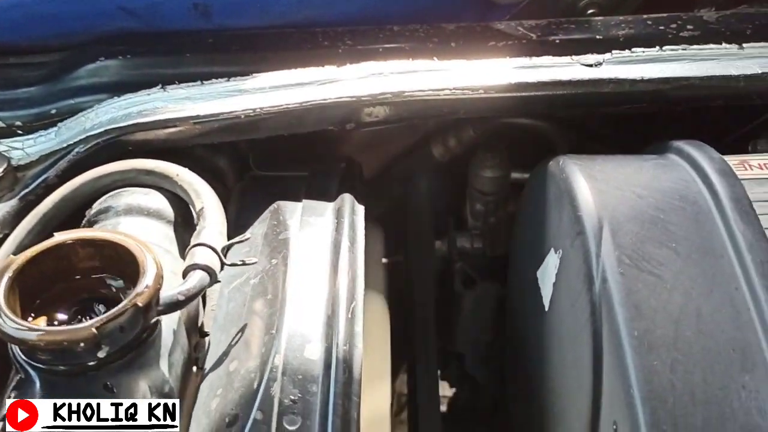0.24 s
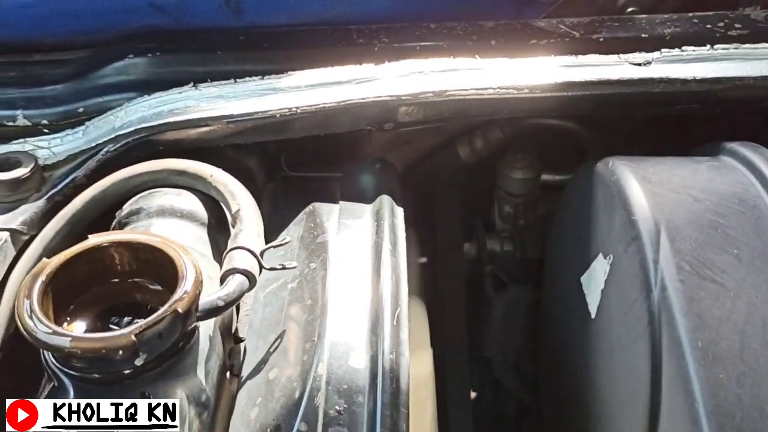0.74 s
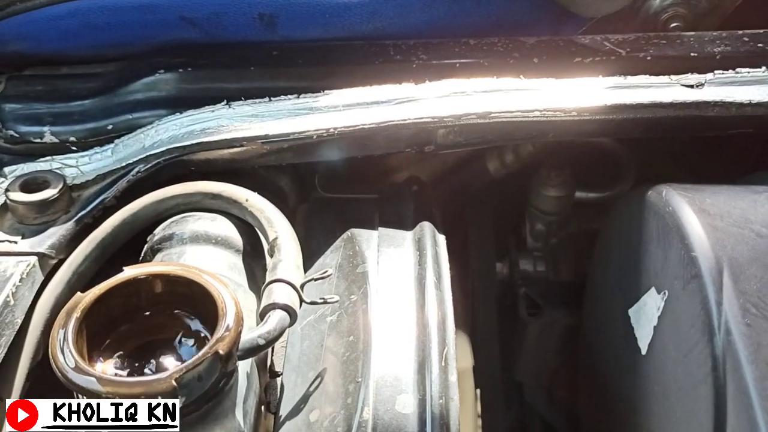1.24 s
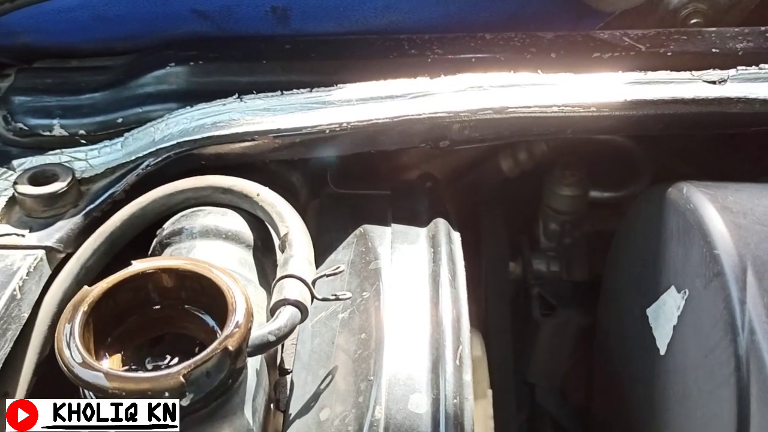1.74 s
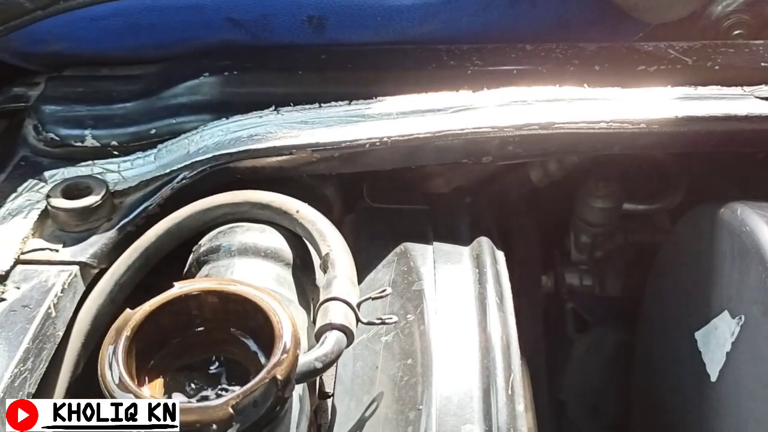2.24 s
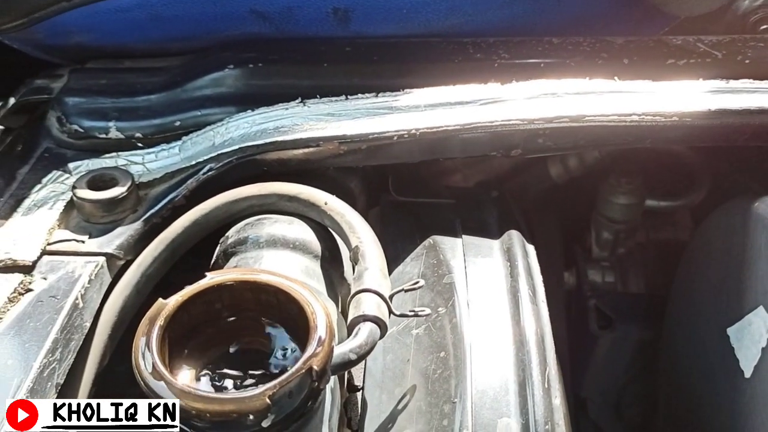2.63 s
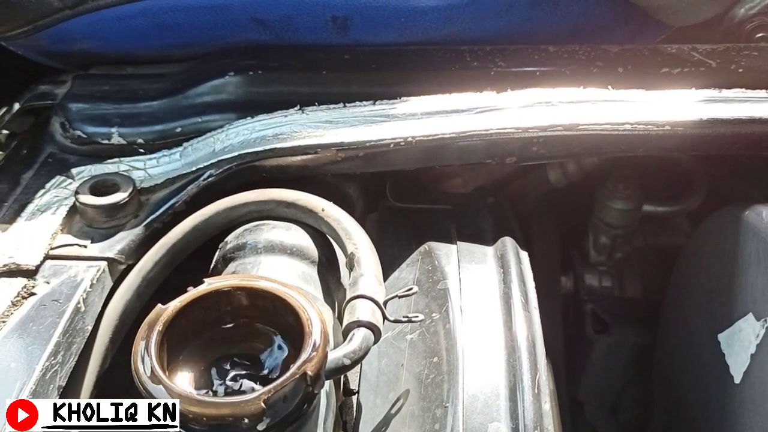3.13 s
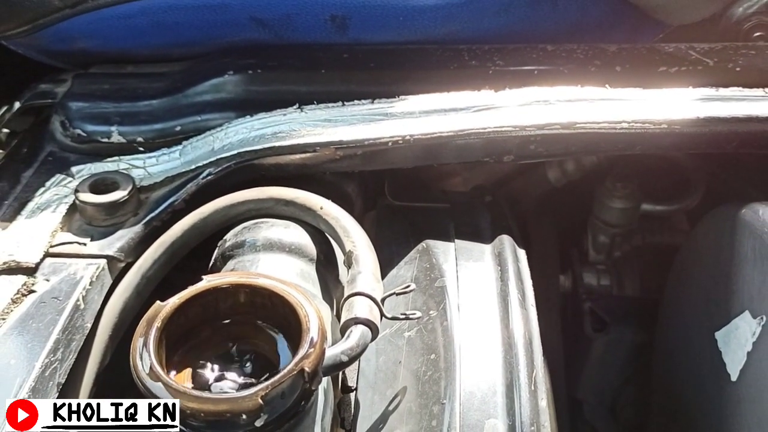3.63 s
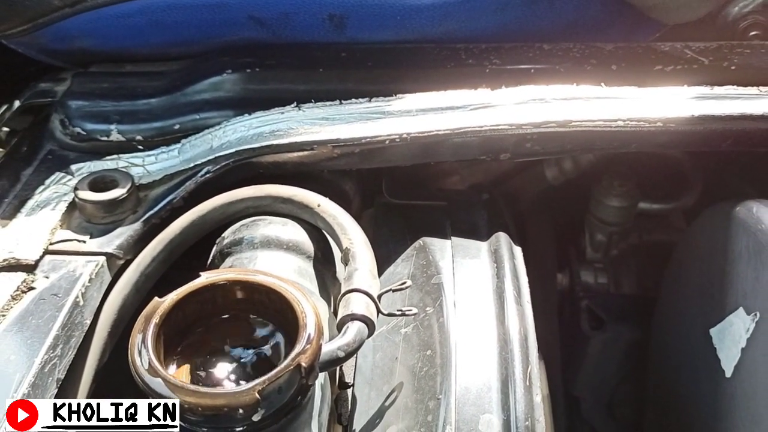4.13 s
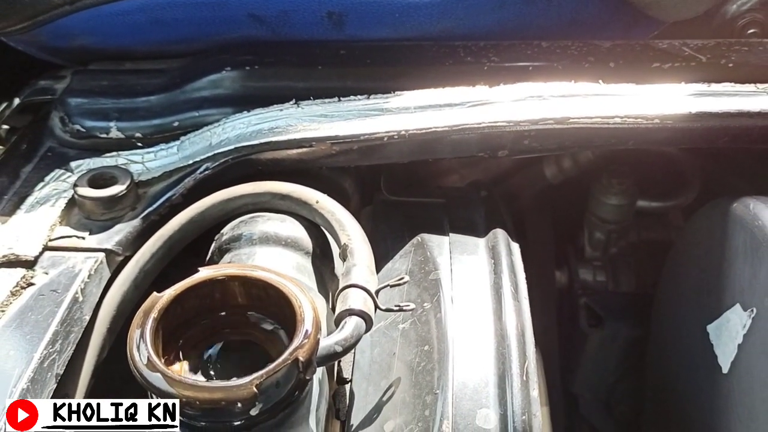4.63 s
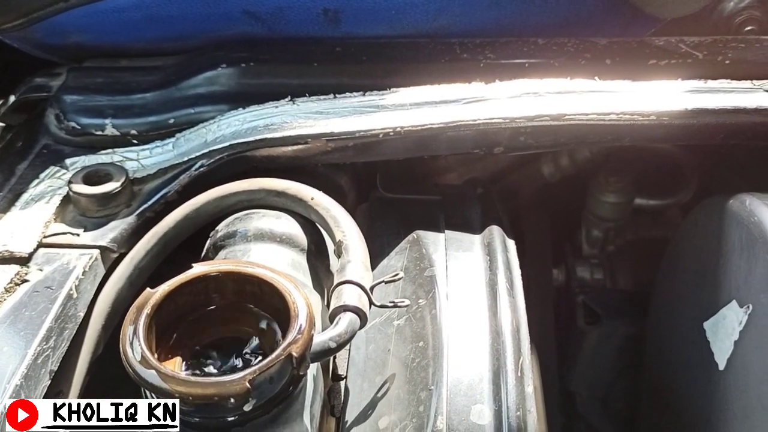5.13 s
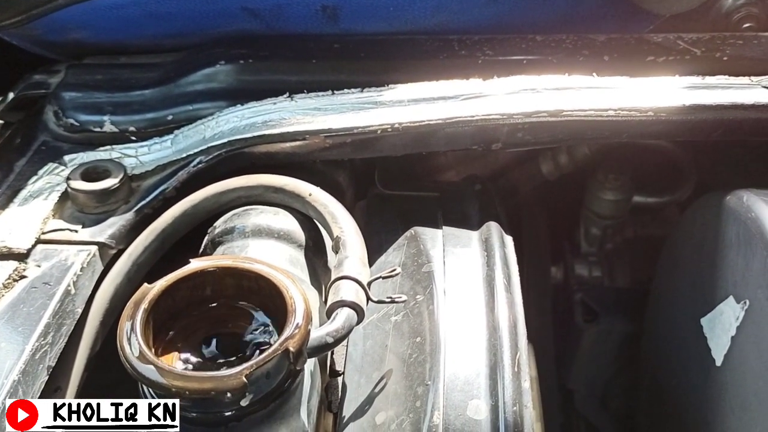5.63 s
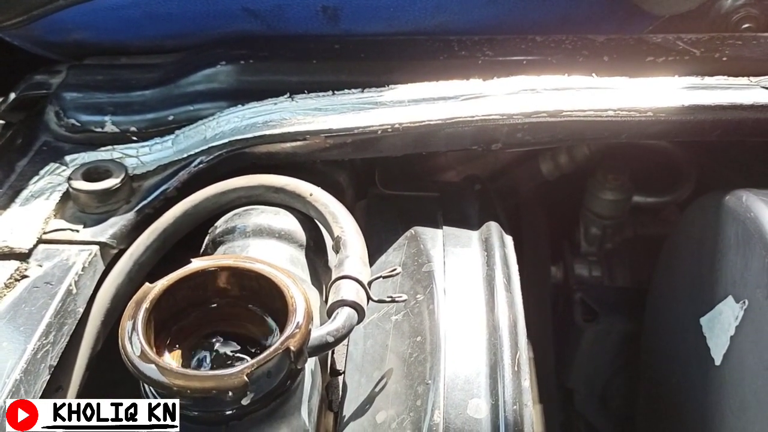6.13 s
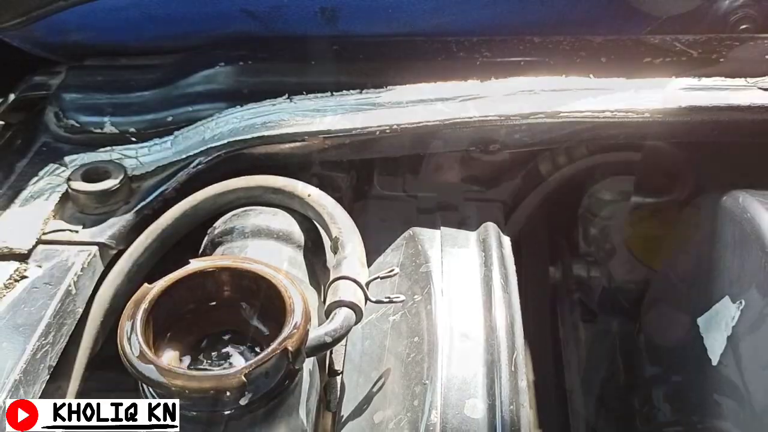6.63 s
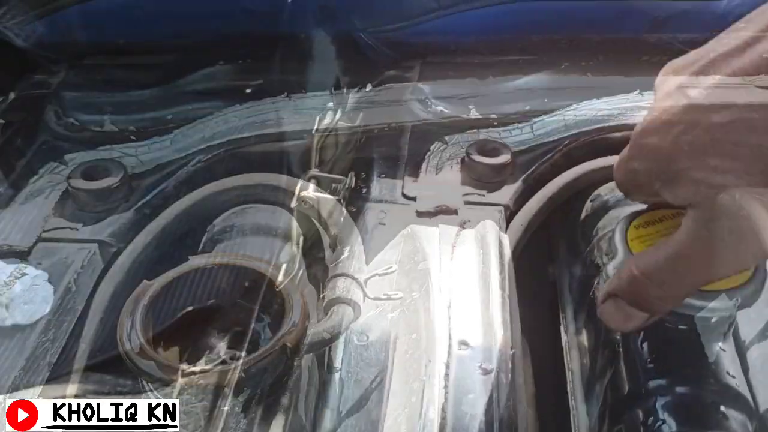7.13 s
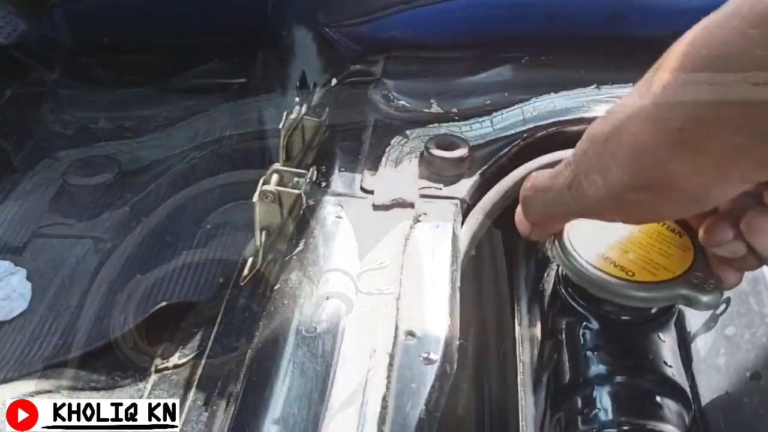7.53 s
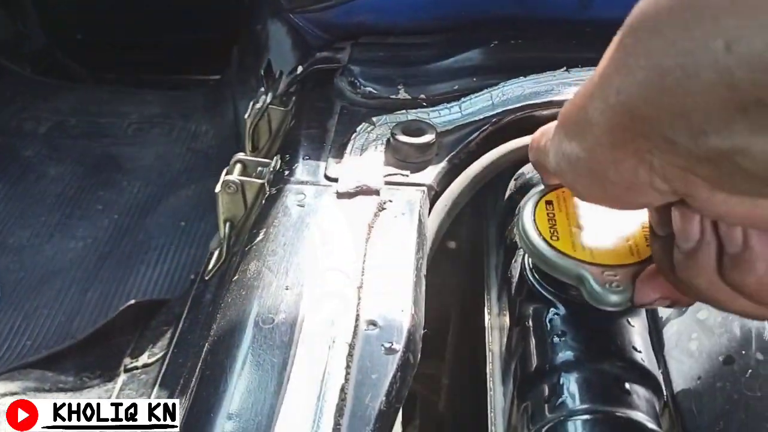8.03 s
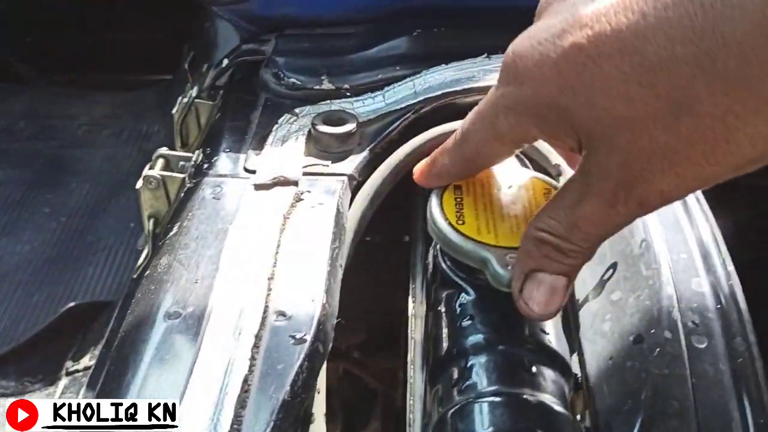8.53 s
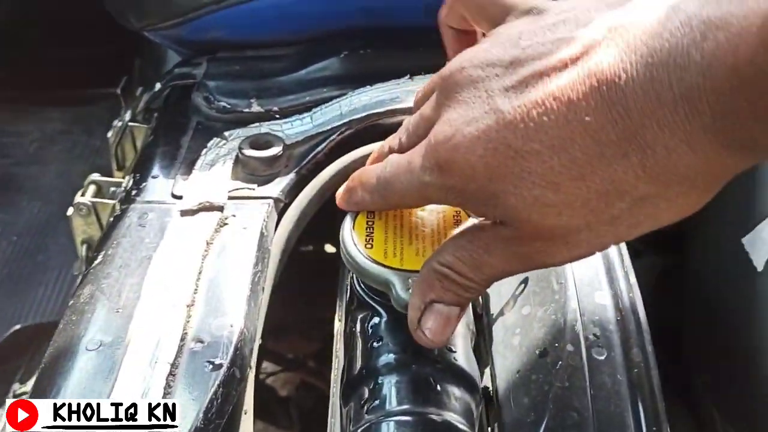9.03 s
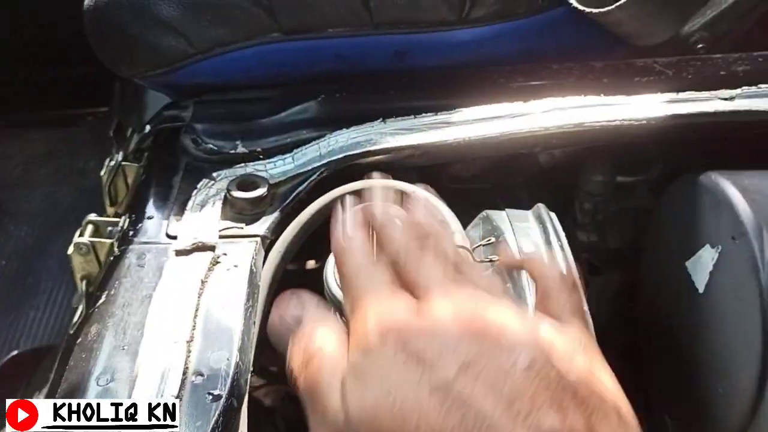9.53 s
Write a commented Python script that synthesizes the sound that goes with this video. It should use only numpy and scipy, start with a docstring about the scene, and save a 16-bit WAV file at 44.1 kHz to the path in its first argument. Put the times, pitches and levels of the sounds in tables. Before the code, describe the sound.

A diesel engine idles, revs up to a steady fast idle with air buffeting the microphone, then fades back to a slow, knocking idle.

```python
"""A four-cylinder diesel under an open bonnet, heard from just above the radiator.
It starts at idle, each firing knocking the block and ticking the injectors, while the fan's draught
buffets the microphone. Near 2 s it revs up: the intake booms, the fan hums, and it holds a fast idle.
From about 6 s that run fades away as a slow idle fades in. Just before the end the radiator cap
clicks as a hand turns it."""
import sys
import numpy as np
from scipy import signal
from scipy.fft import rfft, irfft, next_fast_len
from scipy.io import wavfile
from scipy.ndimage import uniform_filter1d

SR = 44100
rng = np.random.default_rng(int(sys.argv[2]) if len(sys.argv) > 2 else 0)


def to_wav(s):
    """Save 16-bit WAV."""
    ch = np.atleast_2d(s).T  # columns
    pcm = np.round(np.clip(ch, -1, 1) * 32767)  # PCM
    wavfile.write(sys.argv[1], SR, pcm.astype(np.int16))


N = 432180
TIME = np.arange(N) / SR
IDLE_RATE, FAST_RATE = 27.2, 57  # firings per second


def amp(db):
    """Decibels to gain."""
    return 10 ** (np.asarray(db) / 20)


def curve_at(points, hz):
    """Look up a curve on a log-frequency axis."""
    points_hz, values = np.transpose(points)
    return np.interp(np.log(hz + 1), np.log(points_hz), values)


def automation(rows):
    """Draw each column of a timed table as a curve over the whole scene."""
    times, *columns = np.transpose(rows)
    return [np.interp(TIME, times, column) for column in columns]


def wander(per_s):
    """Smooth random modulation of unit size."""
    count = int(N / SR * per_s) + 2
    slow = np.fft.irfft(rfft(rng.standard_normal(8192))[:count], 8192)
    return np.interp(TIME, np.linspace(0, N / SR, len(slow)), slow / slow.std())


def colour(x, spectrum, modes=()):
    """Minimum-phase EQ of unit energy: a broad curve plus resonances that ring after each blow."""
    size = 4096
    hz = abs(np.fft.fftfreq(size, 1 / SR))
    peaks_db = sum(top / (1 + (2 * (hz - centre) / width) ** 2) for centre, width, top in modes)
    log_gain = np.log(amp(curve_at(spectrum, hz) + peaks_db))
    impulse = np.fft.ifft(np.exp(np.conj(signal.hilbert(log_gain)))).real[:size // 2]
    return signal.oaconvolve(x, impulse[None] / np.linalg.norm(impulse), axes=1)[:, :N]


def pan(db):
    """Constant-power stereo gains; positive dB leans left."""
    gains = amp(np.array([db, -db]).reshape(2, -1) / 2)
    return gains / np.sqrt(np.mean(gains ** 2, 0))


def fader(travel, range_db):
    """Gain of a tapered fader, from shut at 0 to open at 1."""
    return (amp(range_db * np.clip(travel, 0, 1)) - 1) / (amp(range_db) - 1)


def crossings(count):
    """Samples at which a count passes a whole number."""
    return np.flatnonzero(np.diff(np.floor(count)) > 0)


def blows(at, db, rise_s, decay_s):
    """Envelope of blows at given samples, each swelling and dying away."""
    train = np.bincount(np.clip(at, 0, N - 1).astype(int), amp(db), N)
    t = np.arange(SR // 6) / SR
    shape = (1 - np.exp(-t / rise_s)) ** 2 * np.exp(-t / decay_s)
    return signal.oaconvolve(train, shape / shape.max())[:N]


def tone(cycles, db, waver, lag_rad, pan_db):
    """A sine wavering in level and phase, lagging on the right."""
    wobble = 1 + waver * (wander(5.2) + 1j * wander(10))
    line = amp(db) * np.sqrt(2) * np.exp(2j * np.pi * (cycles % 1)) * wobble
    return np.array([line.real, (line * np.exp(-1j * lag_rad)).real]) * pan(pan_db)


def ringing(hz, width_hz):
    """A stereo noise band of unit size around a pitch that may move."""
    pole = np.exp(-np.pi * width_hz / SR)
    noise = rng.standard_normal((2, N)) + 1j * rng.standard_normal((2, N))
    low = signal.lfilter([1], [1, -2 * pole, pole * pole], noise)
    band = (low * np.exp(2j * np.pi * np.cumsum(hz * np.ones(N)) / SR)).real
    return band / band.std()


# Rumble of the draught. Each row: frequency in Hz, level in dB.
RUMBLE_EQ = [(25, -30), (50, -25), (80, 1), (120, 1.5), (180, 2), (300, -7), (500, -15), (900, -16),
             (2000, -65.5)]

def rumble(level_db):
    """Turbulent air strikes each microphone port separately in a lumpy flow."""
    lumps_db = 4.5 * np.tanh(wander(40))
    return colour(rng.standard_normal((2, N)) * amp(level_db + lumps_db), RUMBLE_EQ)


# Short, sharp eddies. Each row: time in seconds, level in dB, pitch in Hz.
EDDIES = [(0.181, -8.5, 290), (0.316, -12, 370), (0.466, -6, 370), (0.493, -8, 600), (0.602, -10, 470),
          (0.732, -11, 470), (0.736, -14, 170), (0.781, -6.5, 180), (0.791, -6, 597), (1.035, -12, 600),
          (1.116, -6, 285), (1.382, -7, 600), (1.472, -4.5, 704), (1.777, -7, 600), (1.83, -8, 700),
          (1.98, -9, 470), (2.131, -10, 150), (2.141, -4, 650), (2.165, -5, 420), (2.181, -6.5, 300),
          (2.343, -7, 370), (3.332, -3, 290), (3.372, -7, 370), (3.497, -11, 370), (3.6, -7, 760),
          (3.605, -7, 170), (3.617, -9, 300), (3.63, -8, 600), (3.644, -12, 300), (3.714, -3.5, 184),
          (4.019, -4, 370), (4.1, -8, 368), (4.93, -4, 600), (4.966, -5, 374), (5.186, -8, 370),
          (5.292, -11, 470), (5.596, -4, 372), (5.821, -8, 470), (6.159, -8, 470), (6.2, -1, 466),
          (6.357, -4, 470), (6.659, -9, 370), (6.711, -9, 400), (6.824, -9, 370), (6.966, -12, 600),
          (7.093, -13, 470), (7.176, -8.5, 370), (7.385, -11, 400), (7.762, -17, 400), (9.673, -6.5, 140)]
# Pop of an eddy. Each row: frequency in Hz, level in dB.
POP_EQ = [(60, -10), (150, -1.5), (400, 2), (700, -2), (1200, -10), (2000, -20), (8000, -40)]

def eddies(draught_db, stray_per_s=12, lead_s=.004, width_cycles=.75):
    """Eddies pop on the ports, some at random; the cued ones also push and pull as they pass."""
    stray_at = np.flatnonzero(rng.random(N) < stray_per_s / SR)
    stray_db = draught_db[stray_at] + 1 + 6 * rng.random(len(stray_at))
    cue_s, cue_db, _ = np.transpose(EDDIES)
    at = np.r_[stray_at, (cue_s - lead_s) * SR]
    pops = blows(at, np.r_[stray_db, cue_db - 9], rise_s=.002, decay_s=.005)
    reach = SR // 30
    t = np.arange(-reach, reach) / SR
    swirls = np.zeros(N + len(t))
    for time_s, db, hz in EDDIES:
        push = np.exp(-.5 * (t * hz / width_cycles) ** 2) * np.sin(2 * np.pi * (hz * t + rng.random()))
        swirls[round(time_s * SR):][:len(t)] += amp(db - 5) * push
    return colour(rng.standard_normal((2, N)) * pops, POP_EQ) + swirls[reach:][:N]


# The strongest buffets. Each row: start in seconds, level in dB.
BUFFET_CUES = [(0.461, -12), (0.767, -12), (0.972, -7.5), (1.351, -6.5), (1.468, -24), (1.829, -7),
               (1.898, -6), (2.126, -11), (2.168, -12), (2.317, -8), (3.327, -12), (3.593, -9), (3.629, -8),
               (3.703, -13), (4.346, -1), (4.958, -9), (5.145, -4), (5.29, -4), (5.58, 1.5), (5.807, -14),
               (6.142, -2), (6.186, -12), (6.343, -4), (6.797, -7), (6.955, -8), (7.02, -11.5), (8.5, -30),
               (9.663, -16)]
# Thud of a buffet. Each row: frequency in Hz, level in dB.
THUD_EQ = [(30, -20), (80, -3.5), (150, -5.5), (350, -7), (700, -19), (1200, -17.5), (2500, -34.5),
           (8000, -52)]

def buffets():
    """Big lumps of air thud against the microphone."""
    start_s, db = np.transpose(BUFFET_CUES)
    thuds = blows(start_s * SR, db - 9, rise_s=.0071, decay_s=.017)
    return colour(rng.standard_normal((2, N)) * thuds, THUD_EQ)


# Strength of the draught in the revved run. Each row: time in seconds, level in dB.
DRAUGHT_RIDE = [(0, -23), (2.3, -25.5), (3.2, -26), (6, -27.5)]

def draught(fade, fade_share=.41):
    """Fan air hits the microphone, mostly on the left; its rumble outlasts the revved run's fade."""
    level_db = automation(DRAUGHT_RIDE)[0] + fade_share * 20 * np.log10(fade + .003)
    return rumble(level_db + 2) * pan(7.5) + (eddies(level_db) + buffets()) * pan(11.5)


# Light metal clicks. Each row: start in seconds, level in dB, pitch in Hz, bandwidth in Hz.
CLICK_CUES = [(1.152, -18, 8000, 5000), (9.6184, -15, 4230, 900)]

def clicks():
    """Two small, dry clicks of metal, the second as a hand turns the radiator cap."""
    return sum(blows(np.array([start_s * SR]), [db], rise_s=.0005, decay_s=.003) * ringing(hz, width)
               for start_s, db, hz, width in CLICK_CUES)


# Fan blade tones and engine orders that sing out at fast idle.
# Each row: multiple of the firing rate, level in dB.
SINGING_TONES = [(4.2543, -21.2), (4.5, -32.5), (8.5086, -31.5), (8.75, -36), (9, -33.5)]

def singing(firings, speed):
    """Fan blade tones and engine orders grow steeply with speed, then level off at fast idle."""
    speed_db = -42 * np.log2(speed / FAST_RATE) ** 2
    return sum(tone(order * firings, db + speed_db, waver=.018, lag_rad=.093, pan_db=.5)
               for order, db in SINGING_TONES)


# Boom of the intake. Each row: frequency in Hz, level in dB.
INTAKE_BOOM = [(105, -45), (160, -41), (180, -30), (200, -28), (215, -22), (221, -24), (226, -29.5)]

def intake(firings, speed, order=4, late_firings=.19):
    """The intake booms as the fourth order glides up into it, then beats against the fan."""
    boom_db = curve_at(INTAKE_BOOM, order * speed)
    return tone(order * (firings - late_firings), boom_db, waver=.07, lag_rad=.35, pan_db=1.6)


# Engine orders. Each row: multiple of the firing rate, level in dB.
HUM_ORDERS = [(1, 5.5), (2, -2.5), (3, 0.5), (5, -3.5), (6, -5), (7, -3), (8, -1), (9, 1.3), (9.5, -13.5),
              (9.75, -5), (10, -4), (11, -10), (13, 6), (17, -8), (18, 2)]
# Boom of the engine bay. Each row: frequency in Hz, level in dB.
BAY_BOOM = [(27, -74), (55, -35.5), (82, -34.5), (115, -31), (140, -61.5), (170, -34.5), (192, -27.5),
            (212, -21), (250, -23.5), (278, -24.5), (310, -47), (500, -38.5), (800, -55.5), (1100, -66)]

def hum(firings, speed, late_firings=.069):
    """Firing orders swell as they sweep through the boom of the bay."""
    drone = 0
    for order, db in HUM_ORDERS:
        smear = order ** 2 / 4  # the bay spreads each pulse in time, so the drone is even
        cycles = order * (firings - late_firings) + smear
        drone += tone(cycles, db + curve_at(BAY_BOOM, order * speed), waver=.08, lag_rad=.35, pan_db=1.6)
    return drone


# Cycles in which the valve gear rings harder. Each row: time in seconds, boost in dB.
VALVE_ACCENTS = [(2.551, 5), (2.836, 4), (2.977, 3), (3.12, 4), (3.33, 5), (3.402, 4), (3.473, 3),
                 (3.542, 3), (3.821, 3), (3.964, 5), (4.033, 4), (4.243, 4), (4.315, 4), (4.455, 3),
                 (4.528, 5), (4.597, 4), (4.667, 7), (4.738, 7), (5.234, 4), (5.517, 3), (5.796, 5),
                 (5.94, 4), (6.22, 4), (6.431, 6)]

def valve_ring(firings, speed, ring_hz=786, ring_db=-21.5, cycle_place=.61, near_s=.03):
    """Once every four firings a part of the valve gear rings, harder at speed."""
    at = crossings(firings / 4 - cycle_place)
    accent_s, boost_db = np.transpose(VALVE_ACCENTS)
    accent_db = (abs(at[:, None] / SR - accent_s) < near_s) @ boost_db
    envelope = blows(at, ring_db + accent_db + rng.standard_normal(len(at)), rise_s=.008, decay_s=.009)
    cycles = np.cumsum(ring_hz + 11 * wander(50)) / SR
    speed_db = 26 * np.log10(speed / FAST_RATE)
    return envelope * tone(cycles, speed_db, waver=.15, lag_rad=1, pan_db=-4.5)


# How alike the two microphone ports sound. Each row: frequency in Hz, likeness from 0 to 1.
PORT_LIKENESS = [(70, .05), (95, .98), (300, .98), (380, 0.6), (500, 0.65), (800, 0.65), (1400, 0.35),
                 (2700, 0.3), (4000, .1), (16000, .1)]
# Their balance. Each row: frequency in Hz, left minus right in dB.
PORT_BALANCE = [(100, 5), (240, -3), (400, -4.5), (800, -1.5), (1150, -0.5), (2400, -7), (5500, -3.5),
                (7000, -11.5), (8500, -1), (14000, -9)]

def port_noise(lead_s=.00041):
    """White noise from the engine at two ports: partly alike, reaching the left one first."""
    size = next_fast_len(N)
    hz = np.fft.rfftfreq(size, 1 / SR)
    left, unrelated = rfft(rng.standard_normal((2, size)))
    alike = np.clip(curve_at(PORT_LIKENESS, hz), 0, 1)
    right = alike * left * np.exp(-2j * np.pi * hz * lead_s) + np.sqrt(1 - alike ** 2) * unrelated
    return irfft(np.array([left, right]) * pan(curve_at(PORT_BALANCE, hz)), size)[:, :N]


# Colours of gear, belt and fan-air whirr, of injector and valve ticks, and of combustion knock.
# Each row: frequency in Hz, level in dB.
WHIRR_EQ = [(40, -19.5), (130, -1.5), (240, 4), (400, 5.5), (650, 7), (1050, 2), (2000, -4.5), (3000, -2.5),
            (4600, -5.5), (5000, -12.5), (6000, -10), (6500, -1.5), (7600, -3.5), (8000, -11),
            (12000, -16.5), (15000, -8)]
TICK_EQ = [(200, -17), (1000, -2), (1600, 5.5), (3000, -1), (4600, 0.5), (5000, -9), (6000, -2.5),
           (6500, 5), (7600, 5), (8000, -3.5), (11500, -7.5), (14000, 1), (15500, -6.5)]
KNOCK_EQ = [(100, -17.5), (400, 6), (1000, -9), (1600, 2), (2400, -4.5), (3000, 0.5), (3700, -10),
            (5000, -8.5), (7000, -19), (9000, -28.5), (16000, -37)]
# Resonances of block, covers and bay. Each row: centre in Hz, width in Hz, boost in dB.
BLOCK_MODES = [(239, 81, 10), (487.5, 36, 7.5), (780.5, 60, 12), (1146, 18, 6.5), (1820, 110, 2.5),
               (1967, 34, 2.5), (2240, 31, 5), (2730, 55, 3), (3470, 66, 6)]

def block(whirr, ticks, knocks):
    """Three forces shake the same metal, each as noise of its own colour."""
    layers = (whirr, WHIRR_EQ), (ticks, TICK_EQ), (knocks, KNOCK_EQ)
    return sum(colour(port_noise() * force, eq, BLOCK_MODES) for force, eq in layers)


# Ticks within one firing. Each row: place from 0 to 1, level in dB.
TICK_PATTERN = [(.92, 1.5), (.04, 0), (.22, -7), (.42, -4.5)]

def tick_force(firings, firing_scatter_db=1.8, tick_scatter_db=1.6):
    """Injectors and valves tick at set crank angles, each firing a little harder or softer."""
    firing_db = firing_scatter_db * rng.standard_normal(int(firings[-1]) + 2)
    power = 0
    for place, db in TICK_PATTERN:
        at = crossings(firings - place)
        chance_db = firing_db[np.round(firings[at]).astype(int)]
        chance_db += tick_scatter_db * rng.standard_normal(len(at))
        power += blows(at, db + chance_db, rise_s=.0005, decay_s=.0048) ** 2
    return np.sqrt(power)


# Knock of the cylinders in firing order. Each entry: level in dB.
CYLINDER_DB = [2.5, -1.5, 1.5, -.5]

def knock_force(firings, scatter_db=1.3):
    """One blow a firing; the four cylinders differ, and so does every burn."""
    at = crossings(firings)
    cylinder = np.round(firings[at]).astype(int) % len(CYLINDER_DB)
    db = np.array(CYLINDER_DB)[cylinder] + scatter_db * rng.standard_normal(len(at))
    return blows(at, db, rise_s=.001, decay_s=.0095)


def clatter(knocks, centre_hz=2500, stray_hz=300, ring_s=.003, slap_s=.014):
    """Each knock sets a different patch of wall ringing, and the piston slaps once more just after."""
    pitch_hz = centre_hz + stray_hz * wander(IDLE_RATE)
    pole = np.exp(-1 / (ring_s * SR))
    force = np.maximum(knocks, signal.lfilter([1 - pole], [1, -pole], knocks))
    slap = .25 * np.pad(force, ((0, 0), (round(slap_s * SR), 0)))[:, :N]
    return amp(-1) * np.hypot(force, slap) * ringing(pitch_hz, width_hz=750) * pan(-4)


# The hardest combustion knocks. Each row: start in seconds, level in dB, centre of the ring in Hz.
HARD_BURNS = [(0.2194, -19, 2760), (0.2558, -16, 2460), (0.3686, -12.5, 2570), (0.5148, -10.5, 2650),
              (0.5858, -15.5, 2310), (0.6583, -14, 1980), (0.698, -15, 2390), (0.8076, -17, 2700),
              (0.878, -15, 2370), (0.9503, -15, 2580), (1.0197, -17, 2480), (1.055, -16, 2360),
              (1.2209, -14.5, 2540), (1.2529, -15.5, 2160), (1.284, -16, 2110), (1.3475, -17, 2340),
              (1.3835, -15.5, 2320), (1.61, -14.5, 2450), (1.7288, -11, 2420), (1.7578, -13.5, 2210),
              (1.8615, -16.5, 2320), (2.1299, -17, 2480), (2.3515, -17.5, 1780), (2.5338, -14, 2170),
              (2.926, -18, 2280), (3.0491, -17, 2260), (3.7358, -14.5, 2250), (3.8041, -12.5, 2070),
              (3.8741, -15, 2090), (4.0142, -18, 1980), (4.4217, -14, 2460), (4.6148, -10, 2620),
              (4.737, -16.0, 2470), (5.1444, -14.5, 2150), (5.5724, -13.5, 1840), (6.1302, -15, 2300),
              (6.3065, -11, 2240), (7.8033, -22, 2270), (7.8765, -19.5, 2500), (7.9498, -20, 2320),
              (7.9881, -18, 2530), (8.0236, -20, 2260), (8.2443, -17.5, 2210), (8.538, -17, 2580),
              (8.757, -12, 2290), (8.831, -16, 2340), (8.978, -11.5, 2340), (9.0142, -15.5, 2390),
              (9.0867, -15.5, 2060), (9.1617, -14.5, 2480), (9.1965, -14, 2330), (9.4167, -9.5, 2900),
              (9.4891, -21, 2190), (9.5628, -7.5, 2560), (9.636, -23, 2190), (9.7124, -27, 2280)]
# Modes of the cylinder wall. Each row: pitch in Hz, level in dB, seconds to fall by 60 dB.
WALL_MODES = [(1650, -1.5, 0.028), (2025, -4, 0.029), (2356, -2, 0.044), (2758, 0.5, 0.04),
              (3140, -0.5, 0.023), (4600, -8, 0.028)]

def wall_ring(gain_db=-4, rise_s=.0012, reach_hz=600, focus_db=6, detune=.02):
    """A hard burn rings the wall, most of all near its own pitch; the piston strikes and rebounds."""
    contacts = [(0, 0), (.0035, -3), (.013, -11)]  # Each row: delay in seconds, level in dB.
    t = np.arange(SR // 12) / SR
    hz, mode_db, t60 = np.transpose(WALL_MODES)[:, :, None]
    envelope = 2 * (1 - np.exp(-t / rise_s)) * np.exp(-np.log(1000) * t / t60)
    out = np.zeros((2, N + len(t)))
    for start_s, burn_db, pitch_hz in HARD_BURNS:
        weights = amp(mode_db - focus_db * np.minimum(abs(hz - pitch_hz) / reach_hz, 1))
        weights /= np.linalg.norm(weights)
        for delay_s, contact_db in contacts:
            cycles = hz * t * (1 + detune * rng.standard_normal(hz.shape)) + rng.random(hz.shape)
            stereo_shift = .3 * rng.random((2, len(hz), 1))
            ring = (weights * envelope * np.sin(2 * np.pi * (cycles + stereo_shift))).sum(1)
            at = round((start_s + delay_s) * SR)
            out[:, at:at + len(t)] += amp(burn_db + contact_db + gain_db) * ring
    return out[:, :N] * pan(-5)


def hard_knock_force():
    """The hardest burns hit the block with a sharper blow."""
    start_s, db, _ = np.transpose(HARD_BURNS)
    return blows(start_s * SR, db - 8.5, rise_s=.0004, decay_s=.0075)


def engine(speed, start_firing, hum_db, whirr_db, tick_db, knock_db, pan_db, singing_db=0):
    """One run: its tones, and the forces of its whirr, ticks and knocks, following speed and load."""
    firings = start_firing + np.cumsum(speed) / SR
    octaves = np.log2(speed / IDLE_RATE)
    pickup = uniform_filter1d(np.gradient(speed) * SR, size=8192)
    load = np.tanh(pickup / 7.6)  # speeding up takes more fuel
    advance = .11 * octaves  # in firings: injection comes earlier at speed
    tones = amp(hum_db + octaves) * hum(firings, speed) + intake(firings, speed)
    tones += amp(singing_db) * singing(firings, speed) + valve_ring(firings, speed)
    whirr = amp(whirr_db + 5.5 * octaves + .7 * wander(270))  # gears and belts, slightly grainy
    ticks = amp(tick_db + 1.2 * octaves + 1.5 * load) * tick_force(firings + advance)
    knocks = amp(knock_db - 2.5 * octaves - .5 * load) * knock_force(firings + advance / 2)
    return [tones] + [force * pan(pan_db) for force in (whirr, ticks, knocks)]


# Speed of the revved run and of the slow idle. Each row: time in seconds, firings per second.
REV_CURVE = [(0.0, 27.08), (0.88, 27.44), (1.26, 31.51), (1.58, 30.08), (1.99, 45.17), (2.46, 54.29),
             (2.77, 56.81), (3.88, 57.01), (4.64, 56.49), (5.64, 56.87), (6.54, 56.54)]
IDLE_CURVE = [(8.43, 27.24), (9.21, 27.36), (9.8, 27.14)]
# The microphone drifts over the revved engine, towards the fan.
# Each row: time in seconds, pan of the metal sounds in dB, level of the singing tones in dB.
MIC_DRIFT = [(0, -3.5, 0), (2.1, 0, -5), (2.6, 3, 1), (3.6, 1.5, -4), (4.7, 3.5, 0), (6.4, 2, 1)]

def scene(fade_start_s=6.25, fade_end_s=8.45, step_db=4):
    """The revved run crossfades into the slow idle; both shake the same block and covers."""
    drift_db, singing_db = automation(MIC_DRIFT)
    revved = engine(automation(REV_CURVE)[0], start_firing=2.07, hum_db=-3.5, whirr_db=-4,
                    tick_db=-1.5, knock_db=-5.5, pan_db=drift_db, singing_db=singing_db)
    idle = engine(automation(IDLE_CURVE)[0], start_firing=3.43, hum_db=-1.3, whirr_db=-.33,
                  tick_db=.98, knock_db=-1.6, pan_db=4.5)
    travel = (TIME - fade_start_s) / (fade_end_s - fade_start_s)
    held_down = uniform_filter1d(1. * (travel < 1), size=1024)  # the idle steps up as the fade ends
    fade_out = fader(1 - travel, range_db=21)
    fade_in = fader(travel, range_db=12.5) * amp(-step_db * held_down)
    tones, whirr, ticks, knocks = (fade_out * a + fade_in * b for a, b in zip(revved, idle))
    knocks = np.maximum(amp(-21) * knocks, hard_knock_force())
    metal = block(amp(-18.5) * whirr, amp(-21.5) * ticks, knocks)
    return tones + metal + clatter(knocks) + wall_ring() + clicks() + draught(fade_out)


def record(dry):
    """Peaks clip at full scale; the treble has a deep notch and a steep upper edge."""
    notch_hz, edge_hz = (8700, 11480), 15560
    band = signal.firwin(511, [*notch_hz, edge_hz], pass_zero=True, window=("kaiser", 7), fs=SR)
    return signal.oaconvolve(np.clip(dry, -1, 1), band[None], "same", axes=1)


dry = scene()
out = record(dry)
to_wav(out)
```